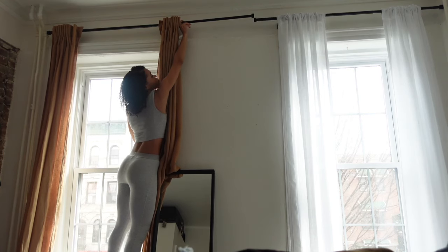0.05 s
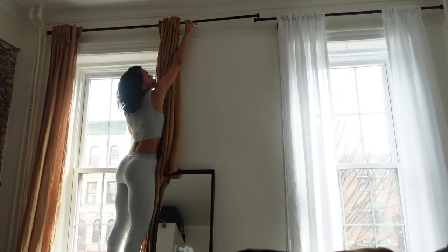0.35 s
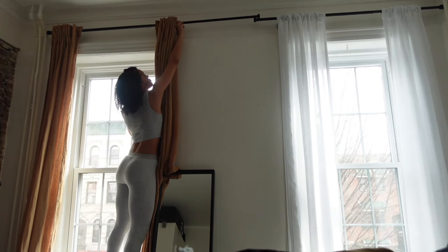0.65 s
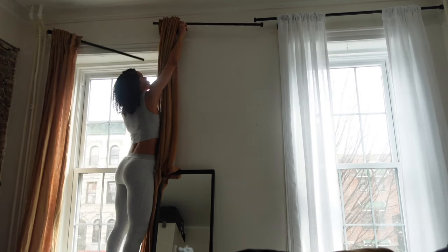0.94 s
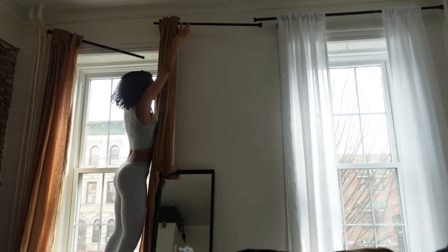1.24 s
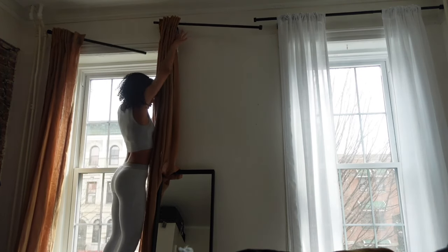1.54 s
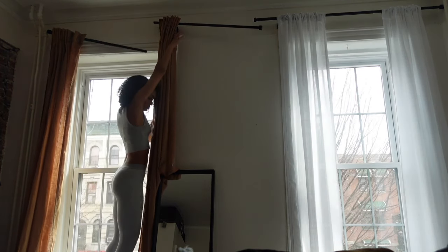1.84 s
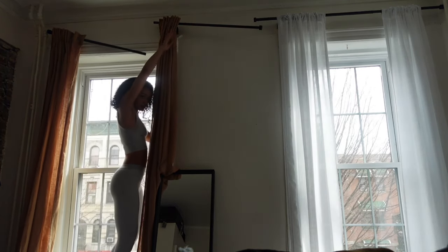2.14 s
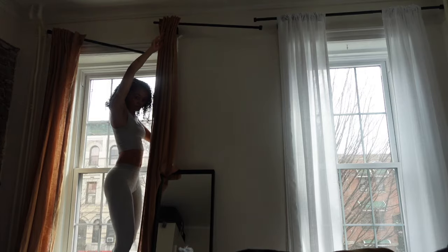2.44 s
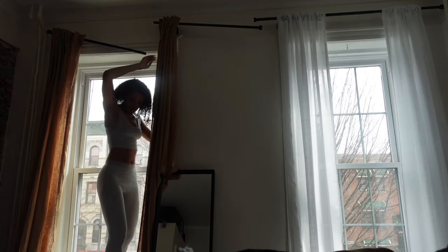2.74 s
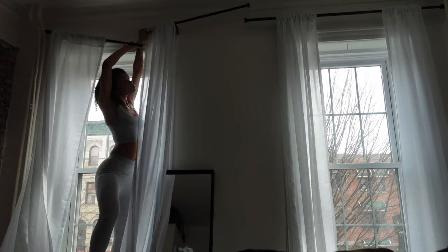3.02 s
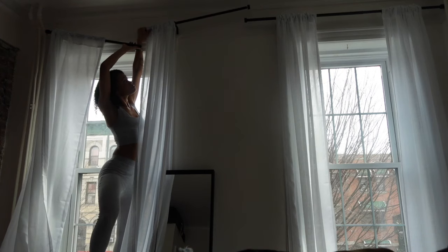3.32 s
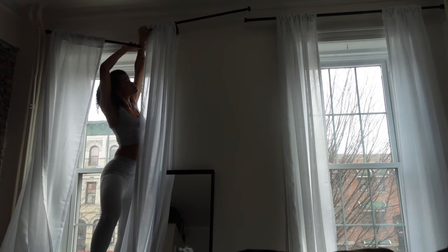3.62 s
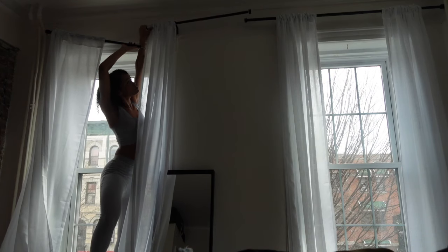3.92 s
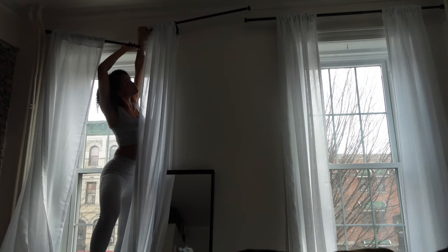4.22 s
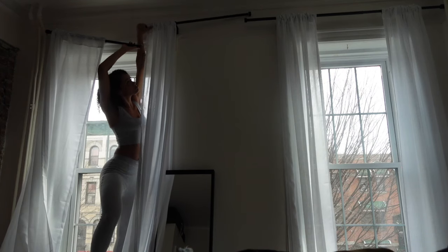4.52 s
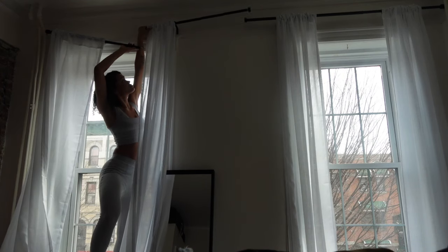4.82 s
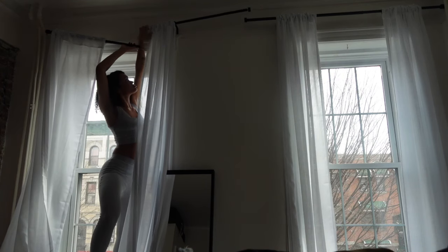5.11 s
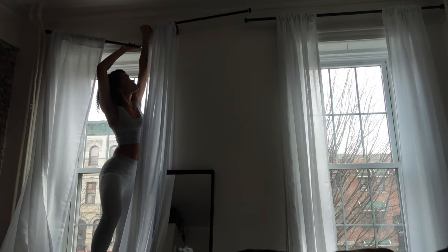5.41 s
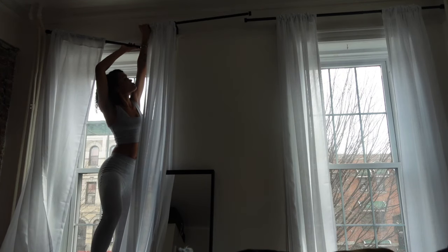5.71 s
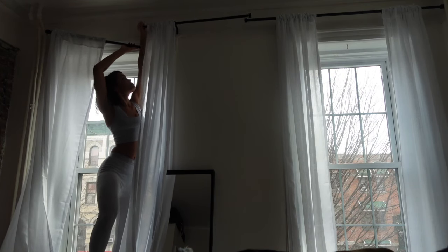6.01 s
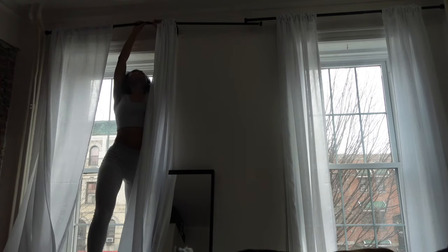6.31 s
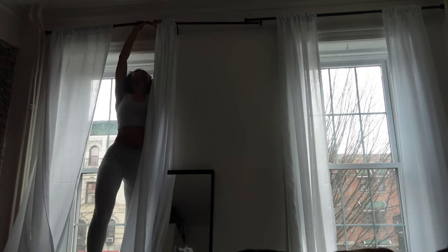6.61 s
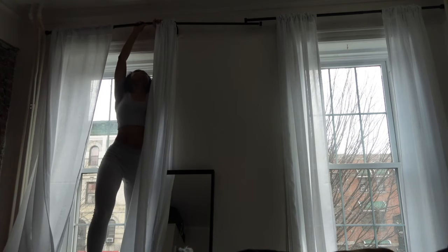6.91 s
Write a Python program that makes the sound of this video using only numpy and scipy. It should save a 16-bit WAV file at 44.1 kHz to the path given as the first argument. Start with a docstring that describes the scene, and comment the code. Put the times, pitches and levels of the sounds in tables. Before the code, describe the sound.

Sharp metal clanks, light knocks and a ringing bracket as a curtain rod is taken down and rehung, the curtain rustling softly.

```python
"""A bare room, a few metres from a telescopic metal curtain rod being slid apart, lifted off and rehung.
The tubes clank, scrape and squeak, the bracket rings, the rod knocks on the wall and the cloth rustles.
Every blow is a brief chatter of contacts: weight behind it adds bass, a hard contact adds treble, and
ringing parts add dying sines. Scrape and rustle are swarms of tiny slips. Close reflections and the
room's tail follow each sound, over a steady hush."""
import sys
import numpy as np
from scipy import signal
from scipy.io import wavfile
from scipy.ndimage import uniform_filter1d

SR = 44100
rng = np.random.default_rng(int(sys.argv[2]) if len(sys.argv) > 2 else 0)


def output_pcm(signal):
    """Save a mono or channel-first signal as 16-bit PCM at the path in sys.argv[1].

    Samples are clipped to [-1, 1] before scaling.
    """
    pcm = np.clip(np.atleast_2d(signal).T, -1, 1) * 32767
    wavfile.write(sys.argv[1], SR, np.round(pcm).astype(np.int16))


N = 315315
RING_SIZE = 2 ** 15  # samples in one blow or room tail
RING_TIME = np.arange(RING_SIZE) / SR

# Cue lists for the blows.
# Each row: start in seconds, level in dB, weight in dB, hardness in dB, chatter decay in seconds.
OUTER_CLANKS = [(.5227, 21.5, -0.5, 0, 0.003)]
INNER_CLANKS = [(.226, 11, 4, 0, 0.017), (.793, 19.5, -0.5, 6, 0.0038), (5.827, 11.2, -4, 0.5, 0.018)]
BRACKET_DROPS = [(6.284, 8, -2, 5.5, 0.0078), (6.338, 3.5, 1, 4, 0.0021), (6.581, -4.5, 8, -2, 0.023)]
LIFT_OFFS = [(1.1705, 12, -2.5, -2.5, 0.0044)]  # the gripped rod flicks off its bracket
CATCHES = [(.695, 6.5, -0.5, -6, 0.0043), (1.046, -4, -9, -1, .003), (1.06, -7.5, 0.5, 11, 0.0049),
           (1.256, 9, -14, 6.5, 0.0031), (1.2905, 3, 3.5, 16, .002), (1.33, -13, 11.5, 24, 0.0018),
           (1.985, -15.5, -4, -16, .004), (2.068, -23, -1, -7, 0.0046), (4.229, -18, -7, -9, .004),
           (5.732, -4.5, -12, -7, 0.0032), (6.096, -31.5, 11, 24.5, .006), (6.187, -35.5, 13, 20, 0.0058)]  # the tubes snag on each other
SNAPS = [(6.954, 6, 1.5, -0.5, 0.003)]  # the tube snaps home
CLINKS = [(3.7107, 0.9, -0.5, 0.5, 0.00072)]  # a curtain ring on the rod
KNOCKS = [(1.098, -5.5, 12.5, 8.5, 0.0023), (2.937, 0.5, 6.5, 8.5, 0.003), (3.17, -19.5, 9.5, -8, 0.031),
          (3.571, 0.7, -5, 4, 0.0017), (3.82, -3.5, -6, -10.5, .0014), (4.814, 4, -17.5, 0.5, 0.00055),
          (5.18, -13, 2, 3, .0015), (5.291, -6.5, 2, 5.5, 0.0015), (5.51, -4.5, -7, -5.5, .0022),
          (5.531, -16, 8, 5.5, 0.00064), (5.766, -12.5, 2.5, -3, 0.019)]  # the rod on the wall and fittings
THUDS = [(4.5763, 17, -2.5, 2, 0.001)]  # the rod's end rammed into the wall
BUMPS = [(.047, -2, 10, -0.5, 0.027), (.076, -1, 5, 1.5, 0.0079), (2.297, -11, -1, 11, 0.011),
         (2.813, -1, -6.5, 4, 0.018), (3.938, 1, -15.5, -11.5, 0.01), (4.108, -15.5, 5, 0, 0.0091),
         (4.476, -11.5, 9.5, 9, 0.042), (5.447, -3.5, 2.5, -3, 0.0068), (7.06, -5, -1, 8, 0.011)]  # shifting weight and handling

# Tilts that turn weight into bass and hardness into treble. Each row: frequency in Hz, share of the dB.
WEIGHT_TILT = [(330, 1), (1240, .3), (3500, 0)]
HARDNESS_TILT = [(1240, 0), (3500, .4), (6800, 1)]

# Colour of the contact force in each kind of blow. Each row: frequency in Hz, gain in dB.
OUTER_FORCE = [(112, -20), (330, -23.5), (1240, -9), (3500, 0), (6800, -3), (12100, -19.5)]
INNER_FORCE = [(112, -12.5), (330, -12), (1240, -5.5), (3500, -1.5), (6800, -10), (12100, -20)]
BRACKET_FORCE = [(112, -8.5), (330, -8), (1240, -1), (3500, 0), (6800, -12.5), (12100, -17)]
LIFT_FORCE = [(112, -33), (330, -21), (1240, -20.5), (3500, -1.5), (6800, -0.5), (12100, -4.5)]
CATCH_FORCE = [(112, -0.5), (330, -4), (1240, -8), (3500, -1), (6800, -8.5), (12100, -18)]
SNAP_FORCE = [(112, -8), (330, -23.5), (1240, -19), (3500, -1.5), (6800, 7), (12100, -2)]
CLINK_FORCE = [(112, -15), (330, -4), (1240, -14.5), (3500, -1), (6800, -13.5), (12100, -34)]
KNOCK_FORCE = [(112, -16), (330, -10), (850, 2), (2400, -1), (3500, -0.5), (6800, -9.5), (12100, -20)]
THUD_FORCE = [(112, -5.5), (240, -0.5), (500, 5.5), (1240, 0.5), (3500, 0.5), (6800, -15.5), (12100, -32)]
BUMP_FORCE = [(112, -11.5), (330, -4.5), (600, -5.5), (1240, -20), (3500, -16.5), (6800, -31.5),
              (12100, -42.5)]

# Modes of the struck or rubbed parts. Each row: pitch in Hz, relative energy in dB, t60 in seconds.
OUTER_MODES = [(1143, -25.5, 0.053), (1620, -19, 0.037), (2080, -14, .16), (2429, -14, 0.065),
               (2780, -18.5, 0.16), (3496, -35, 0.037), (3630, -23.5, .07), (4124, -21, 0.15),
               (4300, -13.5, .08), (5156, -25.5, 0.092), (5604, -19.5, .11), (6874, -21, .15),
               (7800, -11.5, 0.072), (9900, -14.5, .12)]
INNER_MODES = [(1125, -21.5, 0.081), (1371, -19, 0.02), (1493, -14.5, 0.045), (1844, -24, 0.15),
               (3024, -17, 0.19), (3810, -19, .15), (4380, -18.5, 0.061), (4950, -22, 0.13),
               (6040, -14, 0.076), (6400, -21, .08), (7340, -11.5, .22), (7592, -15.5, .15),
               (8540, -17, .1), (14520, -10.5, 0.063)]
BRACKET_MODES = [(1313, -16, 0.052), (1874, -20, 0.1), (3500, -24, 0.79), (3449, -20, 0.82),
                 (3520, -19.5, 0.78), (3650, -25, 0.64), (5030, -15.5, 0.058), (5360, -13, 0.087),
                 (5900, -18, 0.046), (6140, -24.5, 0.046), (9900, -16, 0.62), (10300, -11, 0.28),
                 (9800, -20, 0.14), (10370, -17.5, 0.087), (11200, -10, .04)]
ROD_END_MODES = [(1785, -12, 0.14), (3516, -17, 0.27), (3447, -24.5, 0.86), (3586, -16, 0.09),
                 (6000, -27.5, 0.13), (6550, -11.5, 0.084), (9770, -20.5, .1), (10050, -9.5, 0.13),
                 (10600, -15.5, 0.11)]
CURTAIN_RING_MODES = [(3360, -21, 0.05), (4370, -17.5, 0.019), (5100, -19, 0.035), (6200, -9.5, 0.0086)]
FITTING_MODES = [(827, -23.5, 0.024), (1133, -24.5, 0.04), (1825, -25, 0.036), (2240, -25.5, 0.032),
                 (2520, -20, 0.039), (3650, -21, 0.016), (5030, -21.5, 0.0075), (7160, -17.5, 0.0093)]
PLASTER_MODES = [(145, -30.5, 0.026), (299, -17.5, .025), (348, -24, 0.024), (2436, -19.5, .02),
                 (5160, -17, 0.029)]
RUBBED_TUBE_MODES = [(1590, -16.5, .05), (1925, -23.5, 0.076), (3600, -12.5, .05), (5480, -22, 0.05),
                     (9950, -18, .06)]

# Pushes of the inner tube. Each row: start in seconds, length in seconds, level at full speed in dB.
PUSHES = [(.143, 0.071, -32.5), (0.454, 0.05, -56), (0.686, .07, -37), (1.044, 0.026, -47.5),
          (1.277, 0.028, -38), (6.887, 0.095, -46)]
# The squeak just before the tube snaps home. Each row: start in seconds, length in seconds, level in dB.
SQUEAKS = [(6.87, 0.096, -56.5)]
# The squeak's partials. Each row: starting pitch in Hz, relative level in dB.
SQUEAK_PARTIALS = [(3950, 4), (4950, -3), (10300, -11)]
# Handfuls of gathered cloth. Each row: centre in seconds, half-width in seconds, level in dB.
HANDFULS = [(0, 0.026, -56.5), (1.442, 0.11, -61.5), (2.354, 0.035, -76), (3.18, 0.16, -69),
            (4.953, 0.055, -61), (5.546, 0.66, -71), (5.865, .14, -63.5), (6.153, 0.15, -72)]

# Colours of the scrape, the cloth, the wall and the room tone. Each row: frequency in Hz, gain in dB.
SCRAPE_EQ = [(100, -16), (250, 2), (700, -9), (1500, 0.5), (4000, 4.5), (7500, 5.5), (10000, 4.5),
             (14000, 0.5), (16000, -3.5)]
RUSTLE_EQ = [(100, -9.5), (280, 4.5), (700, 2.5), (1500, -1), (4000, -1.5), (7000, -3.5), (10000, -4),
             (16000, -11)]
WALL_EQ = [(25, -44), (50, -17.5), (75, -7), (130, 5), (200, 5.5), (290, 4.5), (430, -2.5), (620, -5.5),
           (850, -5), (1250, -1), (2500, -7.5), (5000, -5.5), (7500, -6), (9000, -3.5), (13000, -7),
           (16000, -15)]  # wall and room give this to every blow
HUSH_EQ = [(15, -81.5), (25, -41.5), (102, -18.5), (195, -7), (293, -6), (394, -12.5), (624, -11.5),
           (818, -11), (887, -15), (1400, -13.5), (1610, -17), (1740, -17.5), (4030, -25), (4870, -27),
           (16000, -32)]
# Slap off the ceiling and the wall behind the rod. Each row: nominal delay in seconds, relative gain.
REFLECTIONS = [(.0015, 1), (.0043, 0.29), (.0058, .5)]
# Decay of the room's tail. Each row: frequency in Hz, t60 in seconds.
ROOM_DECAY = [(100, 0.63), (260, 0.46), (700, 0.44), (1840, 0.42), (4850, 0.34), (8000, 0.31),
              (14000, 0.22)]
# Stereo width of the echoes and of the room tone. Each row: frequency in Hz, side gain in dB.
ECHO_WIDTH = [(60, -22), (250, -20), (550, -15.5), (1200, -11), (4000, -11.5), (14000, -11)]
HUSH_WIDTH = [(60, -7), (110, -1), (200, -3.5), (380, 3), (700, 3), (1290, 1.5), (2380, 2), (4400, 2.5),
              (8120, 1.5), (15000, -11)]


def tube_clanks():
    """The two tubes clank, each ringing in its own modes."""
    outer = blows(OUTER_CLANKS, OUTER_FORCE, OUTER_MODES, wet_db=1.5, ripple_db=4.5, pan_db=1, ring_db=-9.5)
    inner = blows(INNER_CLANKS, INNER_FORCE, INNER_MODES, wet_db=1, ripple_db=2, pan_db=.5, ring_db=-4.5)
    return outer + inner


def bracket_hits():
    """The rod's open end rings as it lifts off; the bracket rings as the rod drops back in."""
    lift = blows(LIFT_OFFS, LIFT_FORCE, ROD_END_MODES, wet_db=1, ripple_db=-.5, pan_db=1, ring_db=-2)
    drop = blows(BRACKET_DROPS, BRACKET_FORCE, BRACKET_MODES,
                 wet_db=2.5, ripple_db=7, pan_db=.8, ring_db=-4)
    return lift + drop


def tube_catches():
    """The sliding tubes snag and finally snap home: short clacks of contact alone."""
    catches = blows(CATCHES, CATCH_FORCE, wet_db=-2, ripple_db=7, pan_db=1.1)
    snap = blows(SNAPS, SNAP_FORCE, wet_db=-4, ripple_db=4.5, pan_db=1.6)
    return catches + snap


def wall_knocks():
    """Damped by hand and cloth, the rod raps the fittings, thuds into plaster and bumps dully."""
    knocks = blows(KNOCKS, KNOCK_FORCE, FITTING_MODES, wet_db=5.5, ripple_db=-1, pan_db=2, ring_db=1.5)
    thud = blows(THUDS, THUD_FORCE, PLASTER_MODES, wet_db=4.5, ripple_db=2.5, pan_db=.7, ring_db=-1.5)
    bumps = blows(BUMPS, BUMP_FORCE, wet_db=-1, ripple_db=-1, pan_db=1.5)
    return knocks + thud + bumps


def ring_clink():
    """A curtain ring strikes the rod with a short, high ping."""
    return blows(CLINKS, CLINK_FORCE, CURTAIN_RING_MODES, wet_db=5.5, ripple_db=1.5, pan_db=1.1, ring_db=3)


def blows(cues, force, modes=(), *, wet_db, ripple_db, pan_db, ring_db=0, press_s=.0006):
    """A chatter of tiny contacts plus any ringing modes, tilted by weight and hardness, panned left."""
    out = np.zeros((2, N))
    for start, level_db, weight_db, hardness_db, chatter_s in cues:
        contacts = rng.standard_normal(RING_SIZE) * np.exp(rng.standard_normal(RING_SIZE) / 2)
        contacts *= 1 - np.exp(-RING_TIME / press_s)  # attack: the parts press together
        click = whitened(contacts * np.exp(-RING_TIME / chatter_s), bins=200)
        click = overtones(click, ripple_db)
        colour = force, shelf(WEIGHT_TILT, weight_db), shelf(HARDNESS_TILT, hardness_db), WALL_EQ
        ring = amp(ring_db) * coloured(ringing(modes), *colour) if len(modes) else 0
        in_room = room(coloured(click, *colour) + ring, wet_db)
        add(out, start, amp(level_db) * (in_room + ring))  # the rod also radiates its ring straight ahead
    return out * amp([[pan_db / 2], [-pan_db / 2]])


def ringing(modes):
    """A part rings as dying sines, each at a random phase."""
    ring = 0
    for hz, db, t60 in modes:
        sine = np.sin(2 * np.pi * (hz * RING_TIME + rng.random()))
        ring += amp(db) * unit(amp(-60 * RING_TIME / t60) * sine)
    return ring


def overtones(click, ripple_db, spacing_hz=130):
    """Each point of contact favours its own crowded overtones: a random EQ ripple, gentler in the bass."""
    hz = np.arange(spacing_hz, SR / 2, spacing_hz)
    peaks = np.clip(rng.standard_normal(1000), -1.5, 1.5)[:len(hz)]
    ripple = ripple_db * peaks * hz / (hz + 700)
    return unit(coloured(click, np.column_stack([hz, ripple])))


def tube_scrape(swell_db=22, stop_s=.014):
    """In each push the inner tube breaks away, swells as it gathers speed and comes to rest."""
    stroke = np.zeros(N)
    for start, length, level_db in PUSHES:
        t = np.arange(N) / SR - start
        swell = amp(level_db - swell_db * np.clip(1 - t / length, 0, 1))
        release = np.exp(-(np.maximum(t - length, 0) / stop_s) ** 2)
        stroke += (t > 0) * swell * release
    return friction(stroke, SCRAPE_EQ, RUBBED_TUBE_MODES, slips_per_s=4400, spread_db=.5, wet_db=.5)


def tube_squeak(sag=.05, waver=.0091):
    """The tube sticks and slips: a wavering tone swells and sags in pitch as it binds."""
    out = np.zeros((1, N))
    for start, length, level_db in SQUEAKS:
        progress = np.linspace(0, 1, round(length * SR))
        wobble = uniform_filter1d(rng.standard_normal(RING_SIZE), size=100)[:len(progress)]
        pitch_ratio = 1 - sag * progress + waver * wobble / wobble.std()
        clock = np.cumsum(pitch_ratio) / SR
        tone = sum(amp(db) * np.sin(2 * np.pi * hz * clock) for hz, db in SQUEAK_PARTIALS)
        swell = progress * (1 - progress ** 10)
        add(out, start, (amp(level_db) * swell * tone)[None])
    return room(out[0], wet_db=2)


def cloth_rustle(stir_db=-81):
    """The held curtain stirs faintly throughout and swells with each handful."""
    t = np.arange(N) / SR
    swells = sum(amp(db) * np.exp(-((t - centre) / half_s) ** 2) for centre, half_s, db in HANDFULS)
    return friction(amp(stir_db) + swells, RUSTLE_EQ, [], slips_per_s=450, spread_db=1.5, wet_db=1.5)


def friction(stroke, eq, modes, slips_per_s, spread_db, wet_db):
    """Countless small slips of uneven size ride the stroke's envelope and ring what they rub."""
    slips = rng.standard_normal(N) * (rng.random(N) < slips_per_s / SR)
    slips *= amp(spread_db * np.minimum(rng.exponential(1, N), 4))
    rub = np.sqrt(N) * unit(coloured(slips, eq)) * stroke
    body = signal.unit_impulse(RING_SIZE) + ringing(modes)
    return room(signal.fftconvolve(rub, body)[:N], wet_db)


def room(x, wet_db, scatter_s=.00079):
    """Direct sound, close reflections scattered by mouldings and folds, and the diffuse tail."""
    early = signal.unit_impulse(RING_SIZE)
    for delay, gain in REFLECTIONS:
        scatter = unit(rng.standard_normal(RING_SIZE) * np.exp(-RING_TIME / scatter_s))
        early += gain * np.roll(scatter, round(delay * rng.uniform(.85, 1.15) * SR))
    mid = whitened(unit(early) + amp(wet_db) * room_tail(), bins=130)
    response = stereo(mid, room_tail(), ECHO_WIDTH)
    return signal.fftconvolve(x[None], response, axes=1)[:, :len(x)]


def room_tail(build_s=.0061, bass_lag=.4):
    """Dense echoes build up, the bass last, and die at each band's own speed."""
    echoes = rng.standard_normal(RING_SIZE) * (rng.random(RING_SIZE) < .15)
    hz, t, bands = signal.stft(echoes, SR, nperseg=256)
    hz = hz[:, None]
    rise = 1 - np.exp(-(t / (build_s + bass_lag / (hz + 100))) ** 2)
    decay = amp(-60 * t / read(ROOM_DECAY, hz))
    _, tail = signal.istft(bands * rise * decay, nperseg=256)
    return unit(tail[:RING_SIZE])


def room_tone(mid_db=-66):
    """Steady hush of the room and the street outside: a wide bed of coloured noise."""
    mid, side = (unit(coloured(noise, HUSH_EQ)) for noise in rng.standard_normal((2, N)))
    return amp(mid_db) * np.sqrt(N) * stereo(mid, side, HUSH_WIDTH)


def stereo(mid, side, width):
    """Mid and side to left and right; an EQ on the side sets the width."""
    side = coloured(side, width)
    return np.array([mid + side, mid - side])


def coloured(x, *curves):
    """Plays a sound through stacked EQ curves in dB."""
    hz = abs(np.fft.fftfreq(4096, 1 / SR))
    return filtered(x, amp(sum(read(curve, hz) for curve in curves)))


def shelf(tilt, db):
    """An EQ curve that shifts one end of the range by db."""
    return [(hz, share * db) for hz, share in tilt]


def whitened(x, bins):
    """Flattens a burst's broad colour, keeping ripple finer than this many bins; energy 1."""
    power = uniform_filter1d(abs(np.fft.fft(unit(x))) ** 2, bins, mode="wrap")
    return unit(filtered(x, (abs(power[::8]) + 1e-6) ** -.5))


def filtered(x, gain):
    """Minimum-phase filter with this gain round the full circle of frequencies."""
    response = np.exp(np.conj(signal.hilbert(np.log(gain))))
    taps = np.fft.ifft(response).real
    return signal.oaconvolve(x, taps[:len(gain) // 2])[:len(x)]


def read(curve, hz):
    """Reads a curve on a log-frequency axis."""
    knots_hz, values = np.transpose(curve)
    return np.interp(np.log(hz + 1), np.log(knots_hz), values)


def add(mix, start_s, sound):
    """Drops a sound into the mix at its cue."""
    part = mix[:, max(round(start_s * SR), 0):][:, :sound.shape[1]]
    part += sound[:, :part.shape[1]]


def amp(db):
    """Decibels to gain."""
    return 10 ** (np.asarray(db) / 20)


def unit(x):
    """Scales to energy 1."""
    return x / np.sqrt(np.sum(x ** 2) + 1e-20)


def scene():
    """Blows up front, rubbing beneath them, room tone behind."""
    hits = tube_clanks() + bracket_hits() + tube_catches() + ring_clink() + wall_knocks()
    return hits + tube_scrape() + cloth_rustle() + tube_squeak() + room_tone()


def record(dry, cutoff_hz=16000):
    """A steep low-pass trims the very top of the mix."""
    taps = signal.firwin(511, cutoff_hz, window=("kaiser", 9), fs=SR)
    return signal.oaconvolve(dry, taps[None], "same")


dry = scene()
out = record(dry)
output_pcm(out)
```